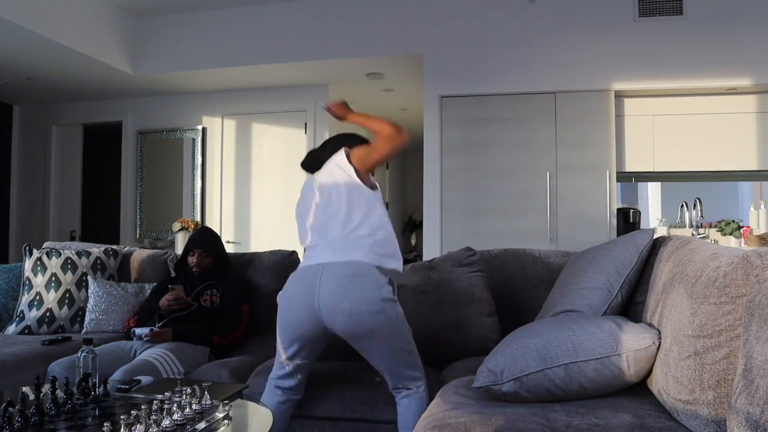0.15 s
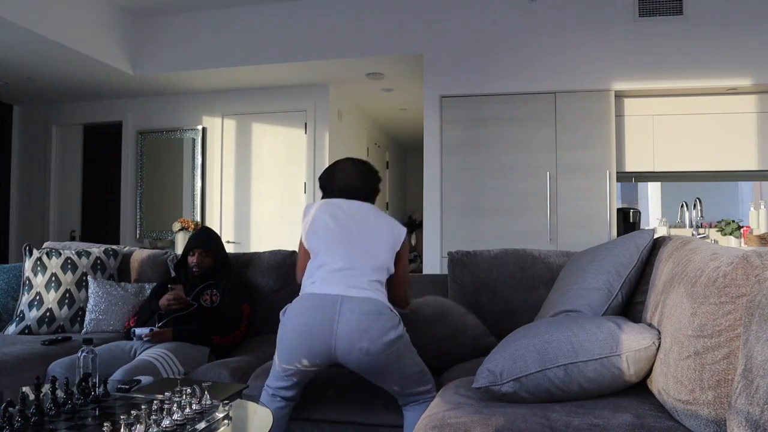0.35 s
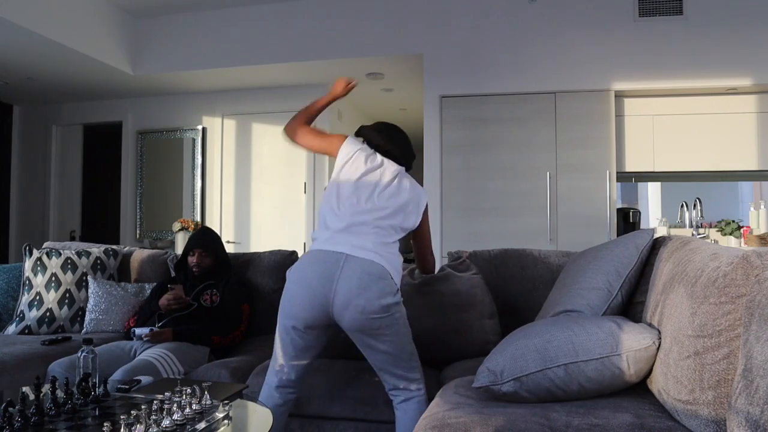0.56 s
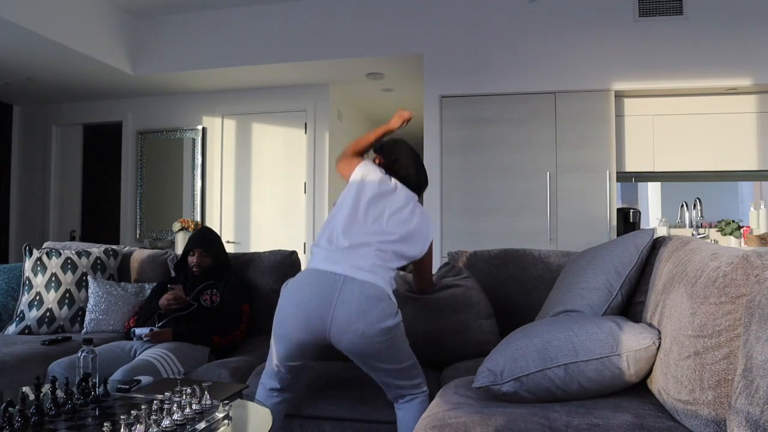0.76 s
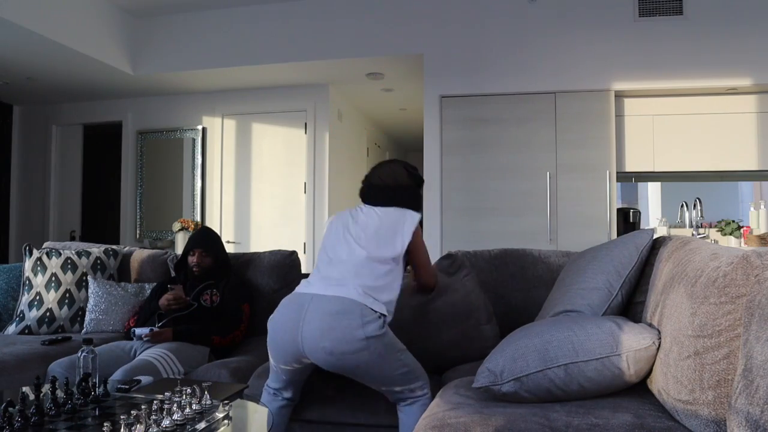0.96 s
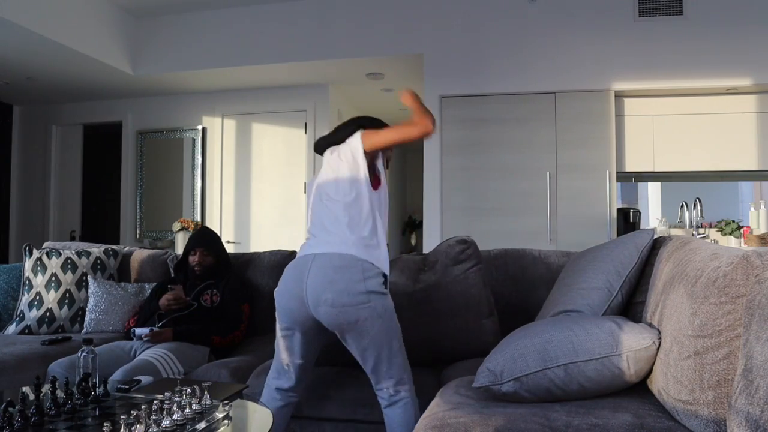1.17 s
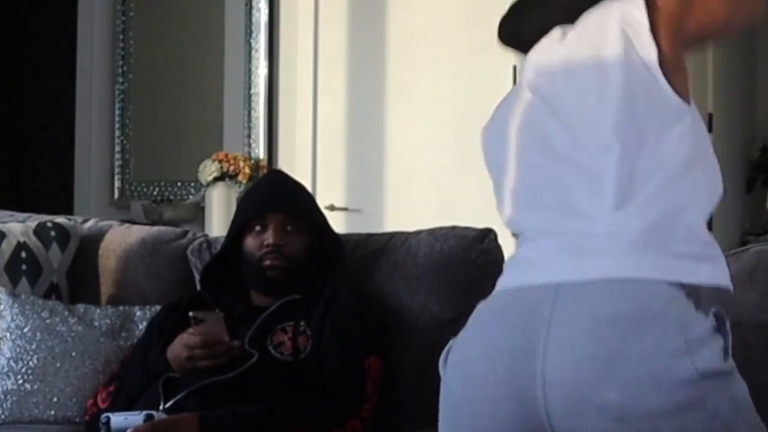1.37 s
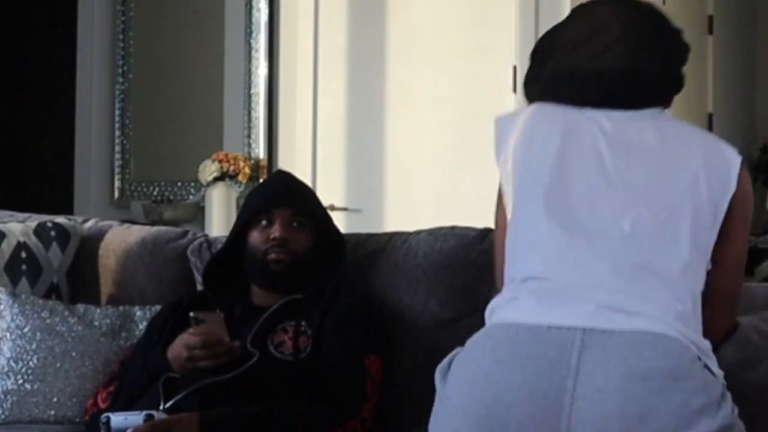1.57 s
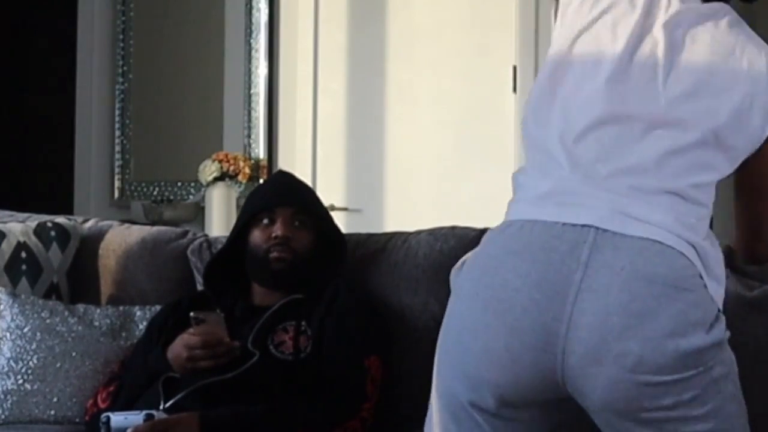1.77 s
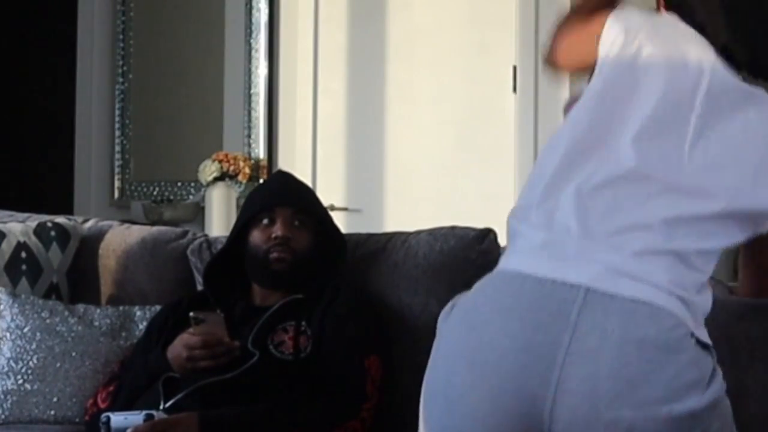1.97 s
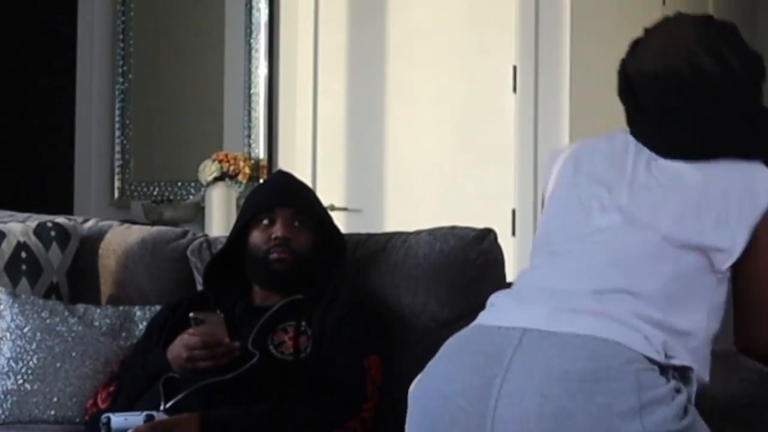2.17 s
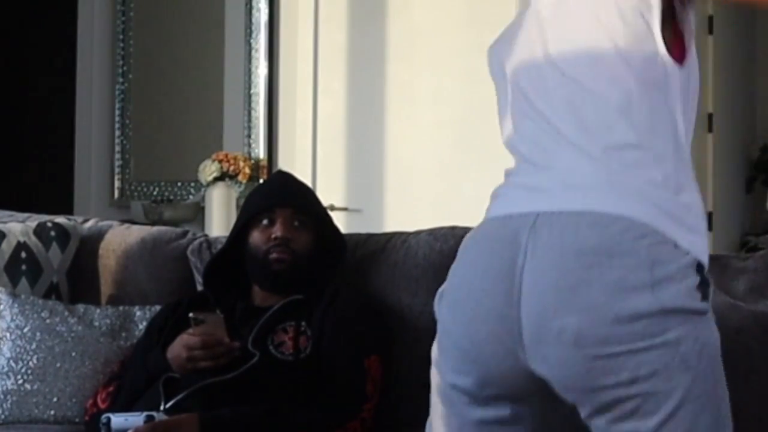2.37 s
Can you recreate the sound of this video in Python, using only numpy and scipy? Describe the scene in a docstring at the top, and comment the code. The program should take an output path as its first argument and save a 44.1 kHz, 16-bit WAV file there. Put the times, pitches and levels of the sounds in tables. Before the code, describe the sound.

Four padded cushion hits, the third faint and glancing, ring through a bare, reverberant room

```python
"""Bare, echoing living room: a hand strikes sofa cushions four times; the third blow only glances off.
Each blow is a slap on the cover (damped resonances and a snap), a pop of trapped air, and a thump
whose pitch sinks as the padding gives. Filtered noise makes the rustling cloth and filling; the sofa
knocks hollowly. Ceiling and walls answer by convolution over quiet ventilation noise and fan tones."""
import sys
import numpy as np
from scipy import signal
from scipy.fft import rfft, irfft
from scipy.io import wavfile

SR = 44100
rng = np.random.default_rng(int(sys.argv[2]) if len(sys.argv) > 2 else 0)


def transcribe(signal):
    """Save signal, clipped to [-1, 1], as a 16-bit WAV file at the path in sys.argv[1]."""
    frames = np.atleast_2d(signal).T
    limited = np.clip(frames, -1, 1)
    pcm = np.round(limited * 32767).astype(np.int16)
    wavfile.write(sys.argv[1], SR, pcm)


N = 107207
TIME = np.arange(N) / SR  # s
FREQS = np.maximum(np.arange(N // 2 + 1) * SR / N, 1)  # Hz, kept above zero for logarithms

# Ventilation noise, relative spectral density: [f/Hz, level/dB per Hz]
AIR_SPECTRUM = [(15, -21), (25, 3.5), (53, -6), (80, -1.5), (141, -1.5), (169, -5.5), (231, -6.5),
                (278, -7.5), (370, -8), (420, -10.5), (712, -13.5), (1330, -20.5), (5000, -34),
                (13000, -40.5)]
# Fan tones: [f at t=0/Hz, rms level/dB, rms wander/Hz]
FAN_TONES = [(76, -52.5, 3.5), (246, -59, 3.65), (378.3, -54.5, 0.93)]
AIR_DB, AIR_SIDE_DB = -47, 3  # rms of the mid signal; extra width beyond that of the room
FAN_SLOWING_PER_S = 0.02  # share of the initial speed lost each second

# Strokes of cloth and filling: [t/s, rise/s, decay/s, level/dB, treble tilt/dB per octave,
# cover resonance f/Hz, its lift/dB, its width/octaves]
RUSTLES = [(0.005, 0.037, 0.02, -50, 3, 1660, 1.5, 0.4), (0.344, 0.012, 0.019, -20.5, -1.5, 1800, 7, 0.25),
           (0.938, 0.0042, 0.011, -21, -0.46, 2580, 5.5, 0.45),
           (0.949, 0.011, 0.034, -27, -2, 870, 9, 0.28), (1.483, 0.0052, 0.022, -43.5, 1.5, 890, 5, .25),
           (1.529, 0.0088, 0.035, -28, 0.93, 710, 6.5, 0.1), (1.68, 0.08, 0.07, -59, 6, 900, 0, .3),
           (2.119, 0.0075, 0.048, -24, -0.5, 703, 5.5, 0.5), (2.29, 0.058, .1, -59.5, 5, 900, -3, .3)]
# Basic colour of the cloth, relative spectral density: [f/Hz, level/dB per Hz]
CLOTH_SPECTRUM = [(20, -40), (70, -20), (250, -2), (340, 6.5), (480, 5.5), (750, -1), (1300, -9),
                  (2200, -15.5), (4500, -24.5), (8000, -37), (11500, -38), (13500, -49)]
CREASE_HZ, CREASE_DB = 151, 2  # rate at which folds catch and slip; rms unevenness of level

# Reverberation by frequency: [f/Hz, level/dB, t60/s, side against mid/dB]
ROOM = [(49.5, -1, 0.83, -30), (122, -14, 1, -19), (233, -2, 0.24, -10.5), (487, 5.5, 0.62, -9),
        (1010, 7, 0.69, -1.5), (2320, 9, 0.76, 3), (4600, 7, 0.83, 4), (13000, 12.5, 0.68, 3)]
# Low modes of the room: [f/Hz, level/dB, t60/s]
ROOM_MODES = [(75.9, -70, 0.88), (116.3, -56, 0.24), (169.5, -53, 0.44), (189, -62.5, 0.48),
              (230.6, -71.5, 0.86), (464, -71, 0.25), (575, -60, 0.39), (890, -58, 0.87)]
BUILD_S = 0.0047  # build-up of the diffuse field
EARLY_DB, EARLY_DECAY_S = -2.5, 0.017  # additional early energy

# Clicks of the clothing: [t/s, level/dB, centre f/Hz, bandwidth/Hz]
TICKS = [(0.0425, -50.5, 6400, 8000), (1.127, -49, 10000, 4000), (1.1336, -42, 10200, 4500)]
TICK_DECAY_S, TICK_WET_DB = 0.002, -8.5

# Contacts of fingers and palm: [t/s, level/dB, f/Hz, damping ratio, air pop f/Hz, air pop level/dB,
# cover snap level/dB]; contact and pop levels are before the band limits below
SLAPS = [(0.3400, -20, 700, 0.9, 383, -13.5, -20), (0.3426, 0.5, 1780, 0.37, 554, -11.5, -5),
         (0.9339, -15.5, 680, 0.12, 340, -15.5, -21), (0.9417, -7, 880, 0.45, 435, -19, -7.5),
         (1.5163, -27, 600, 0.5, 310, -20, -36), (1.5405, -24, 850, 1, 690, -22.5, -22.5),
         (1.5515, -21, 860, 0.4, 744, -23.5, -19.5), (2.1140, -4, 850, 0.43, 565, -13, -14)]
# Snap of the cover, relative spectrum: [f/Hz, level/dB per Hz]
SNAP_SPECTRUM = [(300, -47), (1500, 2.5), (2600, 1.5), (3600, -4), (6000, -13.5), (9000, -25.5),
                 (13000, -27)]
SLAP_LOW_HZ, SLAP_TOP_HZ = 117, 2370  # band limits of contact and air pop
POP_DECAY_S, SNAP_DECAY_S = 0.0024, 0.000654

# Thumps of the cushion: [t/s, level/dB, start f/Hz, rise/s, decay/s, rumble level/dB]
THUMPS = [(0.342, -10.5, 198.5, 0.0084, 0.036, -14), (0.9333, -7.5, 191.8, 0.0026, 0.033, -17),
          (1.5139, -24.5, 174, 0.046, 0.028, -23.5), (2.113, -9, 222.4, 0.0055, 0.028, -17)]
# Rumble of the padding, relative spectral density: [f/Hz, level/dB per Hz]
PADDING_SPECTRUM = [(22, -7), (34, -7.5), (55, -1.5), (85, 0), (130, -0.5), (180, 0), (250, -0.5),
                    (320, -11.5), (600, -62.5)]
THUMP_END_HZ, THUMP_SAG_S = 56.6, 0.0306  # limiting pitch and time constant of its fall
THUMP_WOBBLE, WOBBLE_HZ = 0.23, 124  # uneven give: rms share of the pitch, and its bandwidth
PADDING_DECAY_S, THUMP_WET_DB = 0.072, -4.5

# First reflections: [delay t/s, level/dB, lag of right behind left t/s]
REFLECTIONS = [(.0070, 2.5, .00008), (.0088, -3, -.00012)]

# Hollow knocks of the sofa: [t/s, level/dB, f/Hz, decay/s]
KNOCKS = [(0.3495, -13.5, 575, 0.022), (1.5515, -26, 763, 0.019), (1.5519, -19.5, 324, 0.019),
          (2.1210, -16, 493, 0.014), (2.1210, -20, 682, .008)]
KNOCK_WET_DB = -12

LOW_CUT_HZ, TREBLE_HZ, TOP_HZ = 35, 12700, 13800  # band limits of the output


def undb(db):
    """Amplitude ratio: 20 dB correspond to a factor of ten."""
    return 10 ** (np.asarray(db) / 20)


def along(table, hz, column=1):
    """Interpolation on a logarithmic frequency axis."""
    table = np.array(table)
    return np.interp(np.log(hz), np.log(table[:, 0]), table[:, column])


def noise(db):
    """Spectral shaping of white noise, normalised to rms 1."""
    x = irfft(rfft(rng.standard_normal(N)) * undb(db), N)
    return x / x.std()


def swell(start, rise, decay):
    """Transient envelope: a sine-squared rise followed by exponential decay."""
    age = np.maximum(TIME - start, 0)
    attack = np.sin(np.pi / 2 * np.minimum(age / rise, 1)) ** 2
    return attack * np.exp(-np.maximum(age - rise, 0) / decay)


def ring(start, hz, decay):
    """Impulse response of a resonance: an exponentially damped sine."""
    age = np.maximum(TIME - start, 0)
    return np.sin(2 * np.pi * hz * age) * np.exp(-age / decay)


def stereo(mid, side):
    """Sum and difference: left is mid plus side, right is mid minus side."""
    return np.array([mid + side, mid - side])


def through(x, response):
    """Linear superposition: convolution of a source with a two-channel impulse response."""
    return signal.fftconvolve(x[None], response, axes=1)[:, :N]


def cut(x, hz, kind, order):
    """Butterworth low-pass or high-pass filtering: a maximally flat passband."""
    return signal.sosfilt(signal.butter(order, hz, kind, fs=SR, output="sos"), x)


def ventilation():
    """Broadband flow noise, with frequency-modulated fan tones that waver and slowly sink."""
    colour = along(AIR_SPECTRUM, FREQS)
    width = undb(along(ROOM, FREQS, column=3) + AIR_SIDE_DB)
    mid = noise(colour)
    side = irfft(rfft(noise(colour)) * width, N)
    out = undb(AIR_DB) * stereo(mid, side)
    for hz, db, wander_hz in FAN_TONES:
        wander = wander_hz * noise(-20 * np.log10(1 + (FREQS / 5) ** 2))  # slow, below about 5 Hz
        pitch = hz * (1 - FAN_SLOWING_PER_S * TIME) + wander
        tone = np.sqrt(2) * np.sin(2 * np.pi * np.cumsum(pitch) / SR)
        out = out + undb(db) * tone
    return out


def rustles():
    """Friction noise: strokes coloured by cover resonances, modulated as folds catch and slip."""
    octaves, out = np.log2(FREQS / 1000), np.zeros(N)
    for start, rise, decay, db, tilt, hz, lift_db, width in RUSTLES:
        hollow = lift_db * np.exp(-.5 * (np.log2(FREQS / hz) / width) ** 2)
        cloth = noise(along(CLOTH_SPECTRUM, FREQS) + tilt * octaves + hollow)
        out += undb(db) * swell(start, rise, decay) * cloth
    catches_db = CREASE_DB * noise(-20 * np.log10(1 + (FREQS / CREASE_HZ) ** 2))
    return out * undb(catches_db)


def reverberation():
    """Diffuse-field decay by band, narrow in the bass and wide in the treble, plus room modes."""
    centres = 2 ** np.arange(5, 14.5, .5)  # half-octave bands
    out = np.zeros((2, N))
    early = 1 + undb(EARLY_DB) * np.exp(-TIME / EARLY_DECAY_S)
    onset = np.minimum(TIME / BUILD_S, 1) ** 2 * early
    for hz, weights in zip(centres, np.eye(len(centres))):
        band = np.sqrt(np.interp(np.log(FREQS), np.log(centres), weights))
        spectra = rfft(rng.standard_normal((2, N)))
        decay = np.exp(-np.log(1000) * TIME / along(ROOM, hz, column=2))  # 60 dB in t60
        tail = irfft(spectra * band, N) * onset * decay
        # energy in proportion to the width of the band
        mid, side = tail * np.sqrt(np.mean(band ** 2) / np.sum(tail ** 2, axis=1, keepdims=True))
        width = undb(along(ROOM, hz, column=3))
        out = out + undb(along(ROOM, hz)) * stereo(mid, width * side) / np.hypot(1, width)
    modes = sum(undb(db) * ring(0, hz, t60 / np.log(1000)) for hz, db, t60 in ROOM_MODES)
    return out + modes


def ticks():
    """Brief excitation of a broad resonance: tiny bright clicks of the clothing."""
    out = np.zeros(N)
    for start, db, hz, width_hz in TICKS:
        bright = noise(-10 * np.log10(1 + ((FREQS - hz ** 2 / FREQS) / width_hz) ** 2))
        out += undb(db) * bright * swell(start, TICK_DECAY_S / 2, TICK_DECAY_S)
    return out


def snap(start):
    """Phase dispersion: the weave smears a unit-energy click over a millisecond or two."""
    burst = rng.standard_normal(N) * swell(start, SNAP_DECAY_S / 2, SNAP_DECAY_S)
    phase = np.angle(rfft(burst))
    x = irfft(undb(along(SNAP_SPECTRUM, FREQS)) * np.exp(1j * phase), N)
    return x / np.linalg.norm(x)


def slaps():
    """Impact excitation: a damped contact pulse, a pop of trapped air and a thin snap of the cover."""
    dull, snaps = np.zeros(N), np.zeros(N)
    for start, db, hz, damping, pop_hz, pop_db, snap_db in SLAPS:
        dull += undb(db) * ring(start, hz, 1 / (2 * np.pi * hz * damping))
        dull += undb(pop_db) * ring(start, pop_hz, POP_DECAY_S)
        snaps += undb(snap_db) * snap(start)
    dull = cut(dull, SLAP_TOP_HZ, "low", order=3)
    return cut(dull, SLAP_LOW_HZ, "high", order=2) + snaps


def thumps():
    """Falling-frequency oscillation: the cushion slows unevenly as it gives, and its padding rumbles."""
    out, rumble = np.zeros(N), noise(along(PADDING_SPECTRUM, FREQS))
    wobble = 1 + THUMP_WOBBLE * noise(-10 * np.log10(1 + (FREQS / WOBBLE_HZ) ** 4))
    for start, db, hz, rise, decay, rumble_db in THUMPS:
        sag = np.exp(-np.maximum(TIME - start, 0) / THUMP_SAG_S)
        pitch = THUMP_END_HZ + (hz - THUMP_END_HZ) * sag
        turns = np.cumsum(pitch * wobble * (TIME > start)) / SR
        out += undb(db) * np.sin(2 * np.pi * turns) * swell(start, rise, decay)
        out += undb(rumble_db) * rumble * swell(start, rise, PADDING_DECAY_S)
    return out


def reflections():
    """Specular reflection: direct sound and delayed returns from ceiling and wall."""
    out = np.zeros((2, N))
    out[:, 0] = 1  # direct sound
    for delay, db, lag in REFLECTIONS:
        for ear, late in enumerate((delay - lag / 2, delay + lag / 2)):
            out[ear] += undb(db) * np.sinc((TIME - late) * SR)  # delay by fractions of a sample
    return out


def knocks():
    """Modal response: the sofa gives a short hollow note that depends on where the hand lands."""
    return sum(undb(db) * ring(start, hz, decay) for start, db, hz, decay in KNOCKS)


def scene():
    """Superposition of sources, with separate diffuse responses for hand and cloth."""
    hand_tail, cloth_tail = reverberation(), reverberation()
    direct = TIME == 0  # unit impulse
    return (ventilation()
            + through(rustles(), direct + cloth_tail)
            + through(ticks(), direct + undb(TICK_WET_DB) * cloth_tail)
            + through(slaps(), reflections() + hand_tail)
            + through(thumps(), direct + undb(THUMP_WET_DB) * hand_tail)
            + through(knocks(), direct + undb(KNOCK_WET_DB) * hand_tail))


def record(dry):
    """Band limitation and saturation: deepest bass and top removed, highest peaks rounded."""
    x = cut(dry, LOW_CUT_HZ, "high", order=2)
    x = cut(x, TREBLE_HZ, "low", order=6)
    rounded = x / (1 + x ** 4) ** (1 / 4)
    steep = signal.ellip(8, .2, 70, TOP_HZ, fs=SR, output="sos")  # 0.2 dB ripple, 70 dB rejection
    return signal.sosfilt(steep, rounded)


dry = scene()
out = record(dry)
transcribe(out)
```